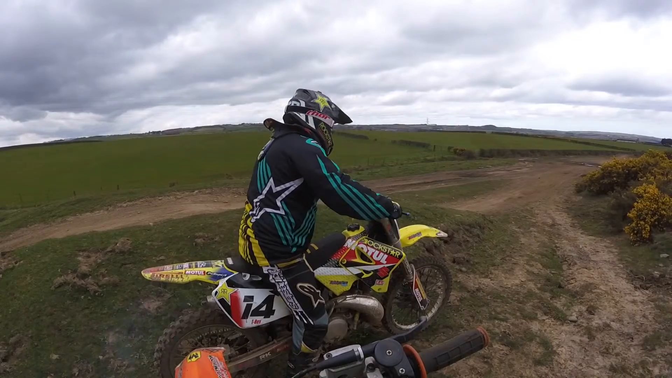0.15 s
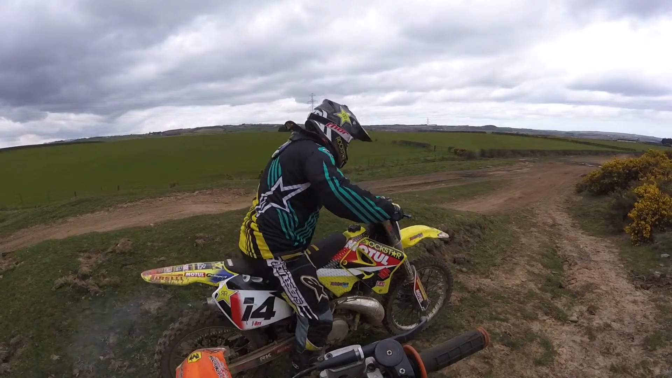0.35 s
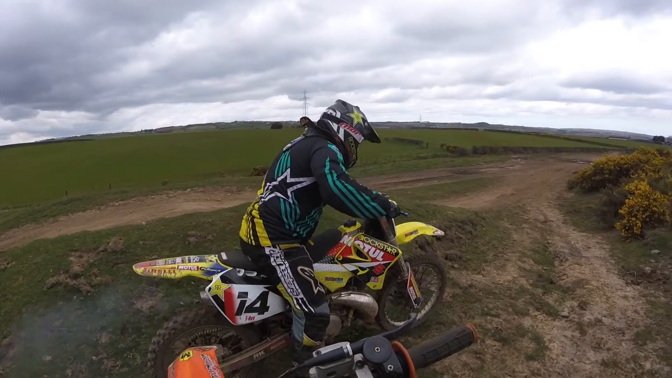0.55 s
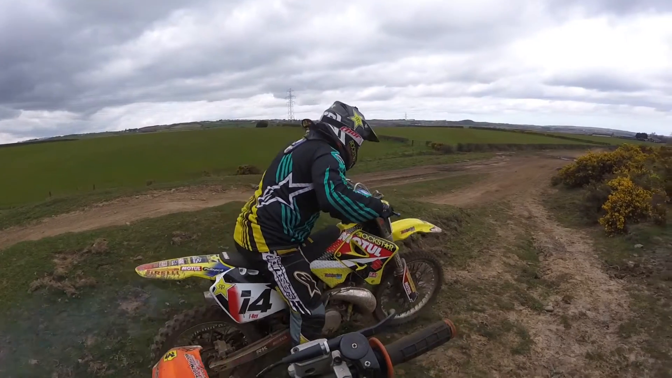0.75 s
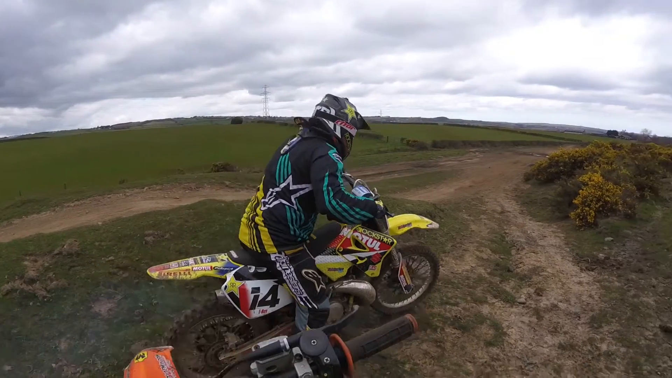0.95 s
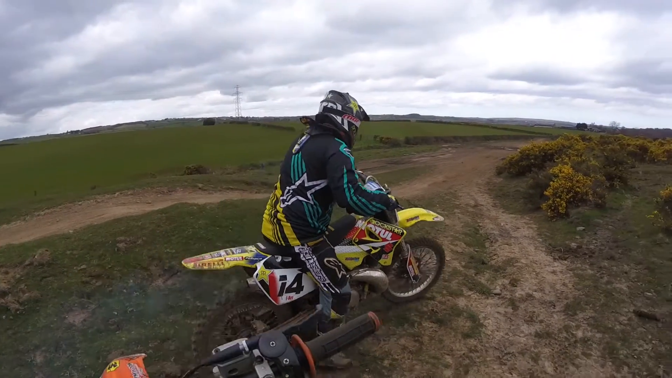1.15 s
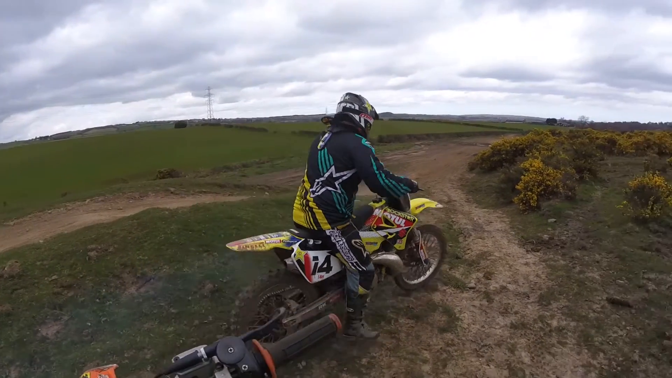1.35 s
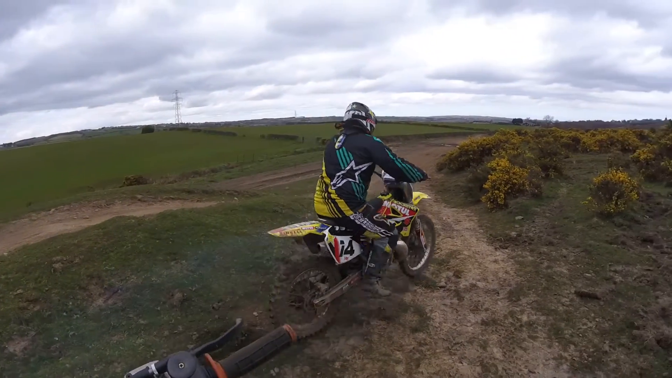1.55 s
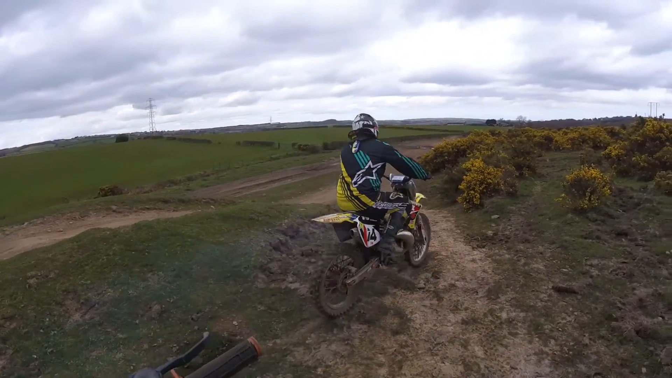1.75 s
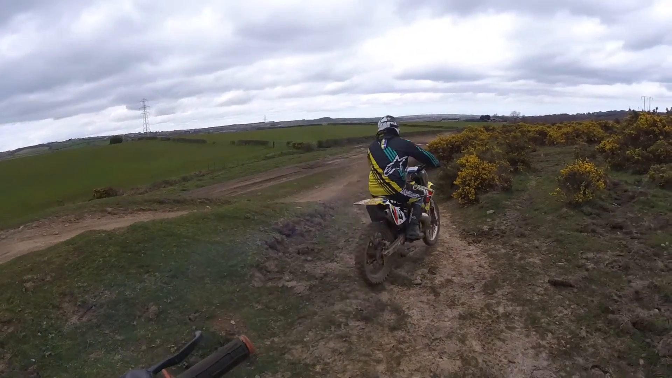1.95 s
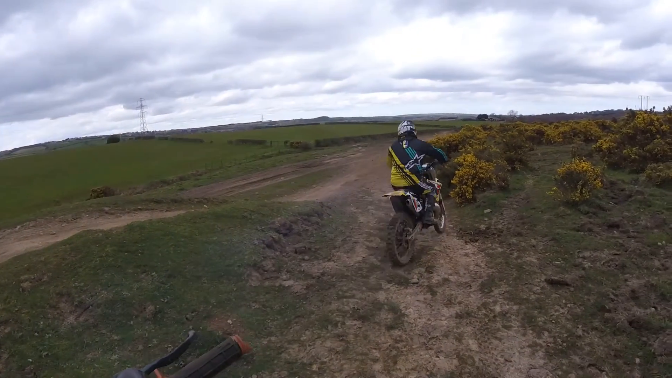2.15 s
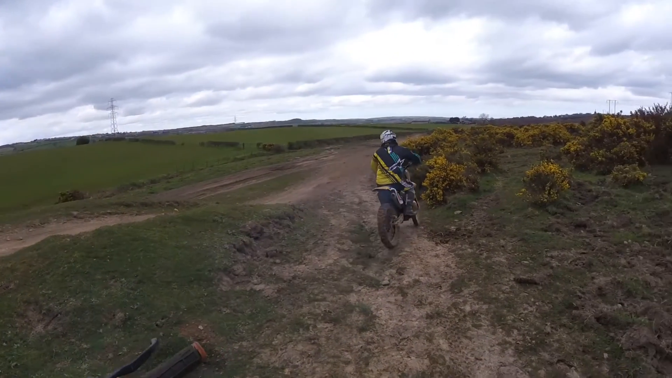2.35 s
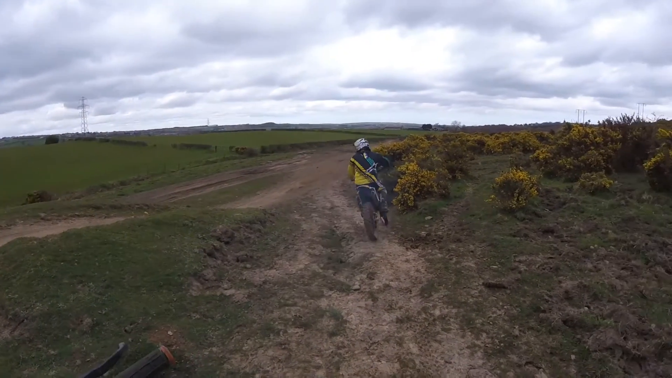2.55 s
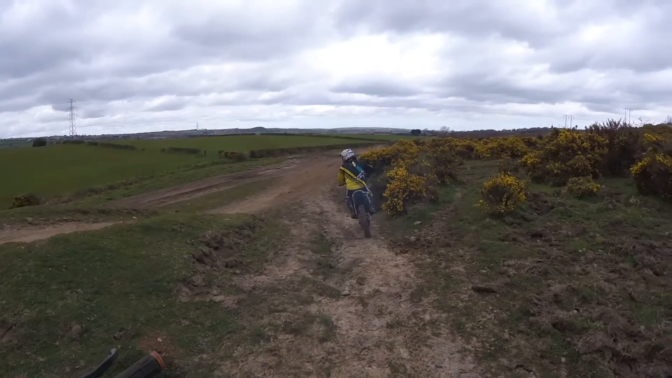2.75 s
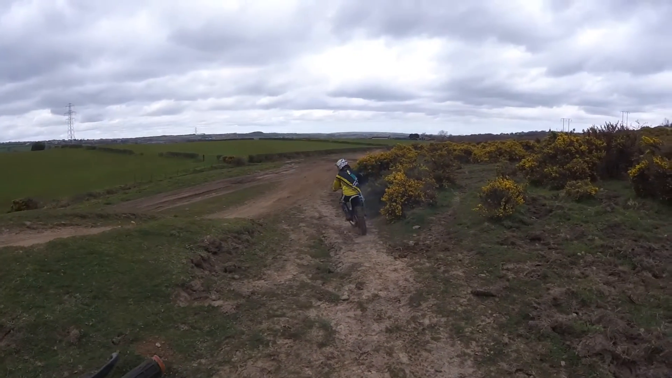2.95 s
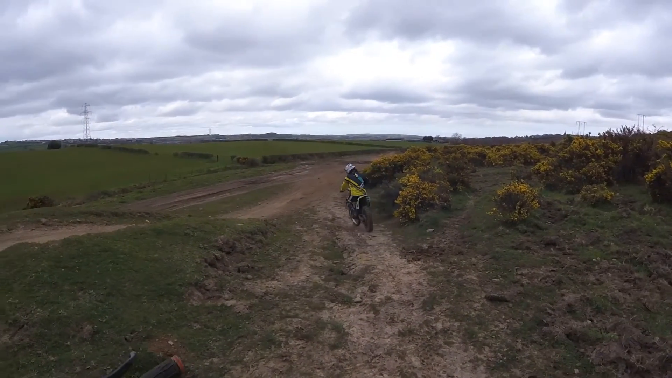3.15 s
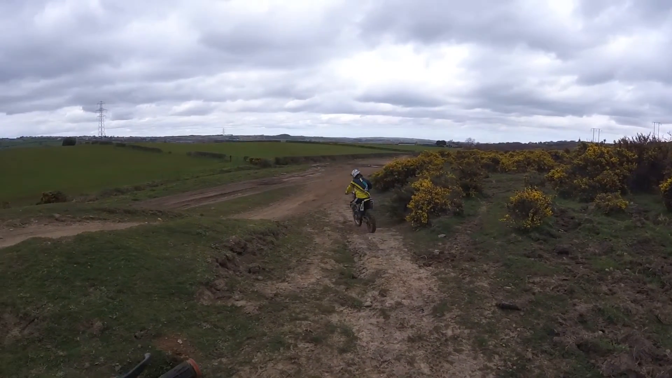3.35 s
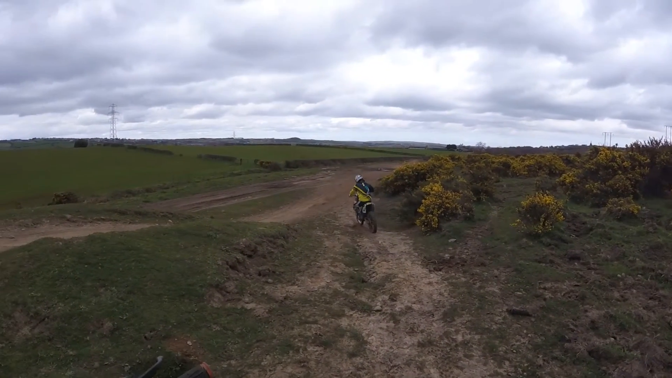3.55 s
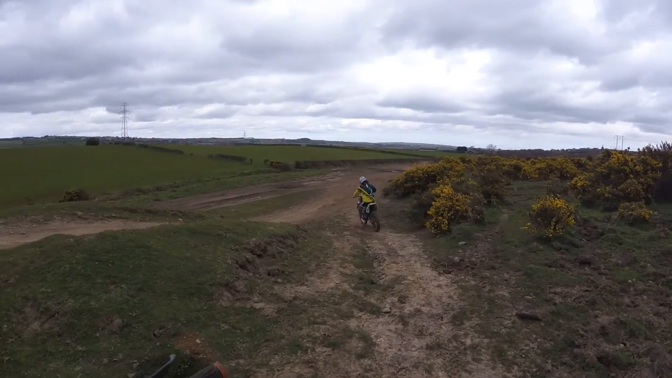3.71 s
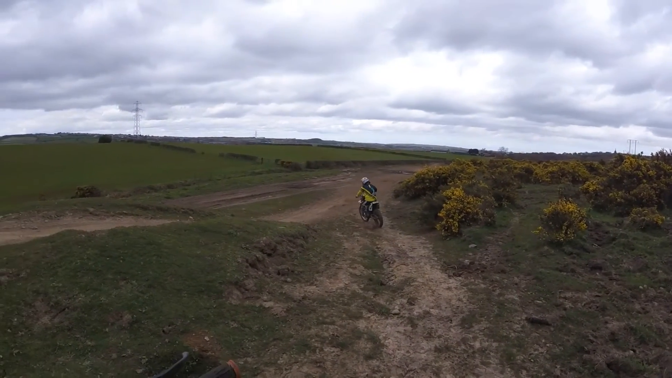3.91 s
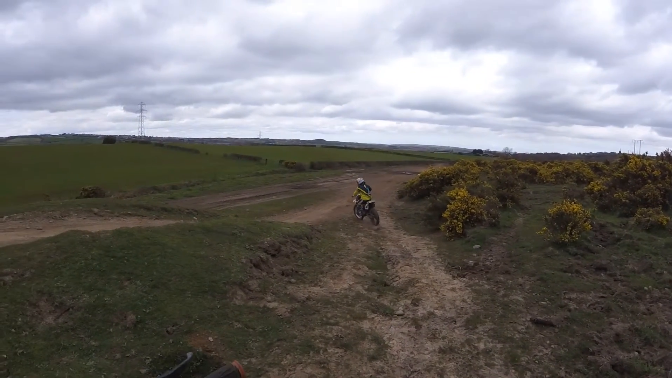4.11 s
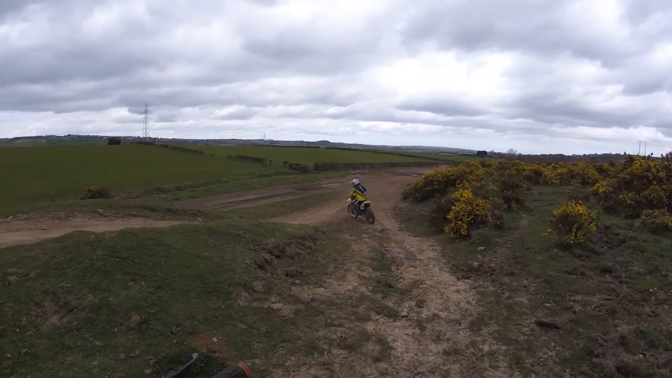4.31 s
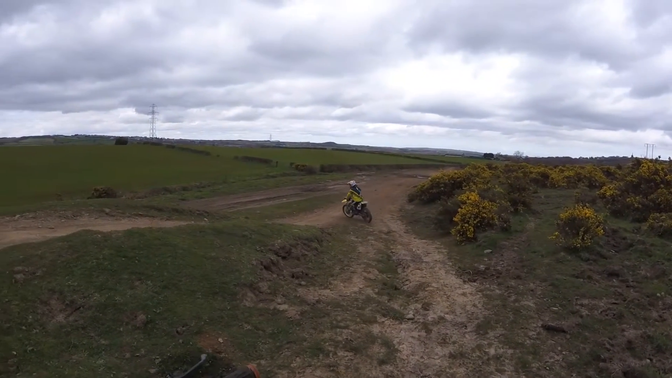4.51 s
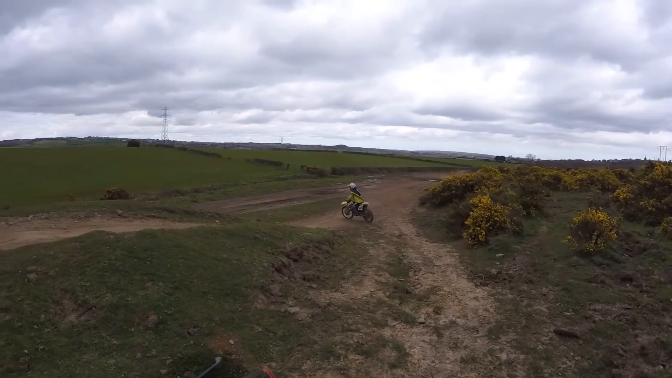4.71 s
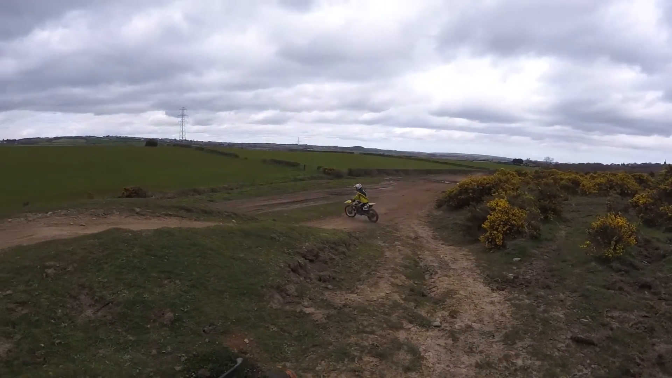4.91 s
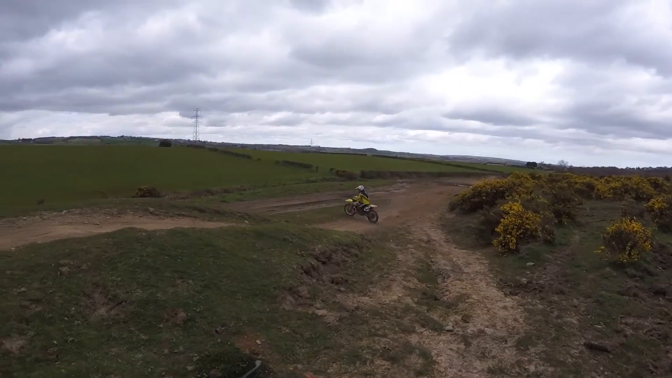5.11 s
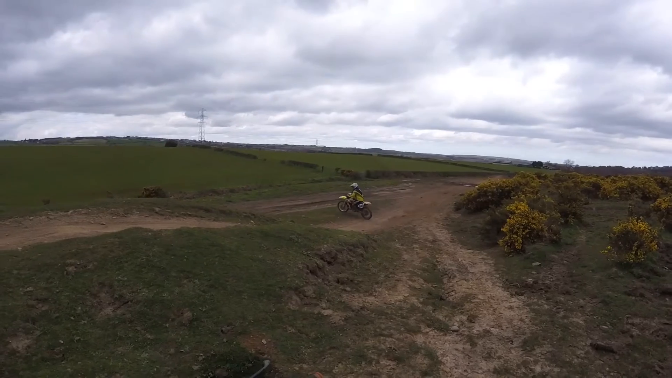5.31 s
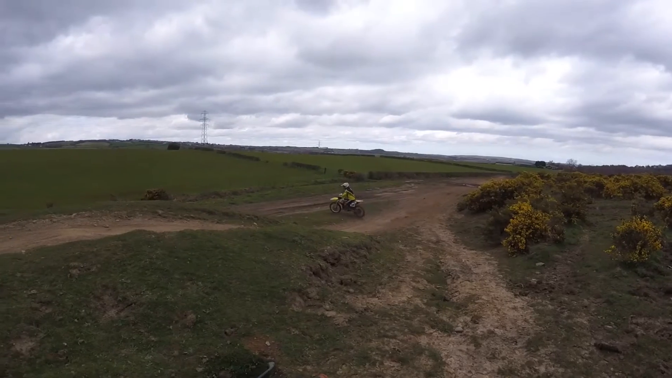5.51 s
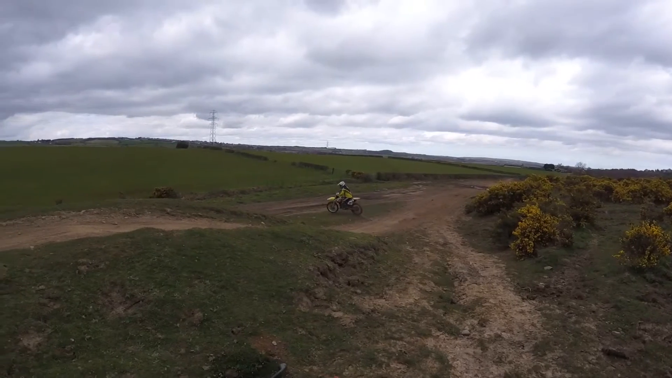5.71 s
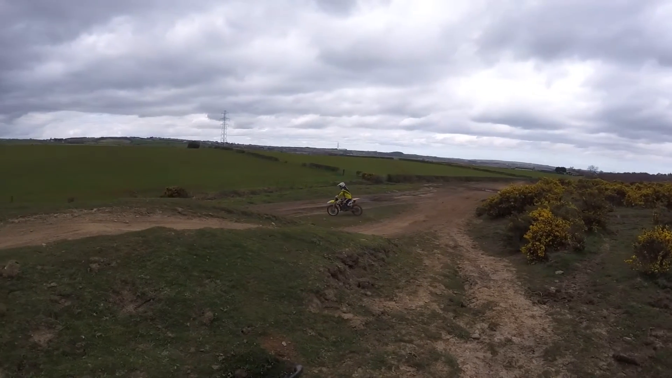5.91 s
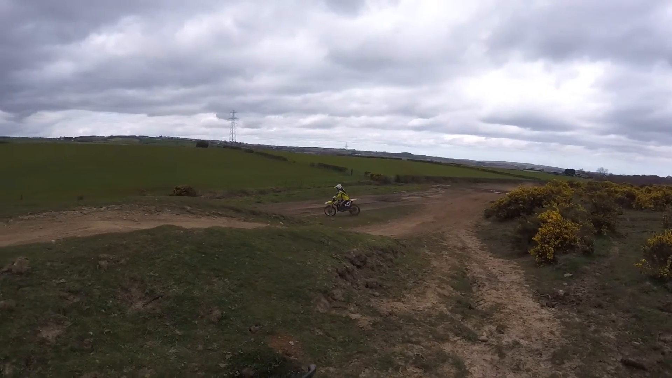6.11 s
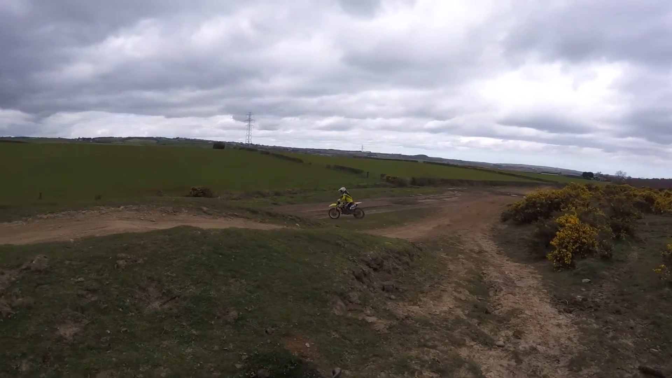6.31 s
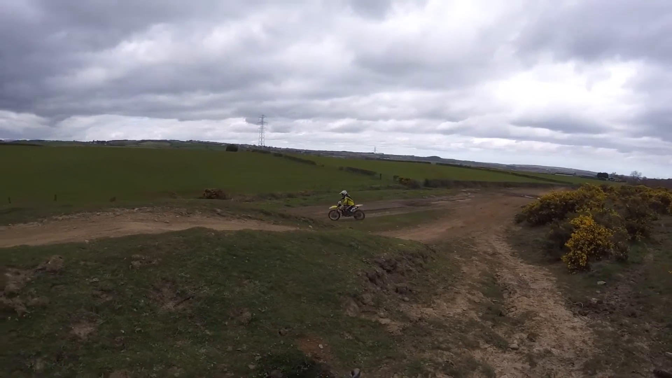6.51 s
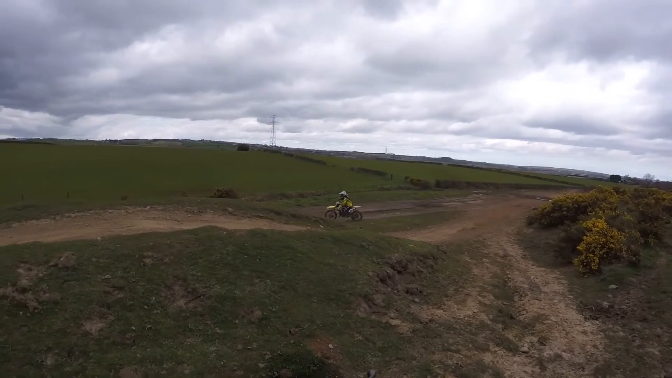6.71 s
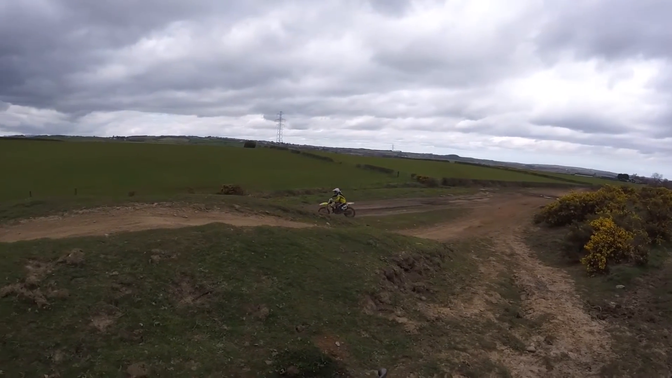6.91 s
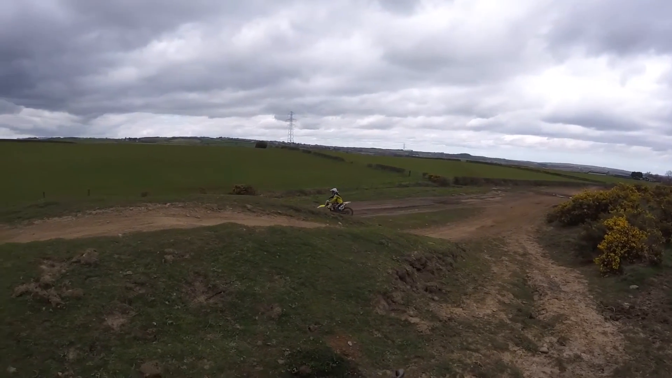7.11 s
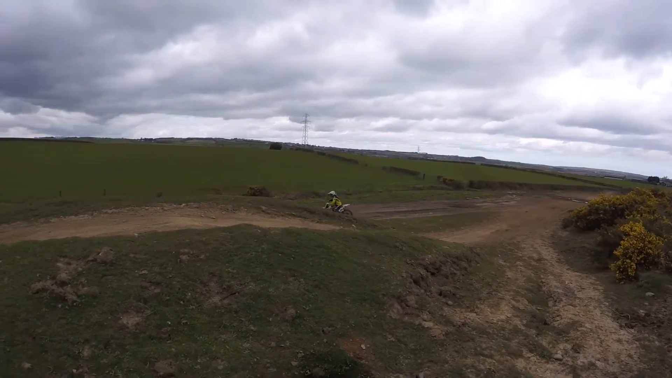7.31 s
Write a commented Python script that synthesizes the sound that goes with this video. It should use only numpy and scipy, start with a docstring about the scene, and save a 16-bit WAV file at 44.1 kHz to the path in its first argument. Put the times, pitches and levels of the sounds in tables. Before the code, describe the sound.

A two-stroke dirt bike idles raggedly up close, blips its throttle with sharp cracks, then rides off along a dirt track, popping fainter into wind.

```python
"""A two-stroke motocross bike blips its throttle beside the microphone, then rides away along a dirt track.
It fires on only some crank turns: each firing cracks, booms as pipe resonances and rings the steel shell and silencer.
Unfired turns slow between firings, with puffs and piston slaps; noise pulses rasp in the intake as air gulps.
Click trains make the chain, unsteady tones the brake drags and a late faint whine, metal modes the tings.
Slow noise makes wind over an open-field hush, and damped tones knock the mount."""
import sys
import numpy as np
from scipy import signal
from scipy.fft import rfft, irfft, next_fast_len
from scipy.io import wavfile
from scipy.ndimage import uniform_filter1d, map_coordinates

SR = 44100
rng = np.random.default_rng(int(sys.argv[2]) if len(sys.argv) > 2 else 0)


def file_out(sig):
    """Save sig as 16-bit WAV at sys.argv[1]."""
    # one column per channel
    cols = np.atleast_2d(sig).T
    # limit, then scale
    lim = np.clip(cols, -1, 1)
    pcm = np.round(lim * 32767).astype(np.int16)
    wavfile.write(sys.argv[1], SR, pcm)


N = 328974

# Spectra give relative density_db; body() sets their overall energy.
# nominal crank speed and pipe pitch: start_s, crank_turns_per_s, hot_gas_pitch_hz, unburnt_gas_pitch_hz
ENGINE = [(0, 42, 333, 292), (.3, 39.5, 324, 266), (.45, 45, 313.4, 275), (0.649, 62, 326.4, 222),
          (.9, 52, 326.3, 227), (1.221, 59, 350.3, 272), (1.58, 48, 349.3, 282), (1.9, 44, 384.5, 342),
          (2.25, 32, 375, 306), (2.55, 48, 270, 245), (3, 46, 315.5, 252), (3.998, 41, 346, 251),
          (4.998, 55, 301, 201), (6, 43, 312, 200), (7.46, 39, 331, 193)]
# exhaust pipe modes: multiple_of_pipe_pitch, relative_level_db, time_to_peak_s
PIPE_MODES = [(1, 10, 0.0044), (.3, -14, 0.0089), (0.72, -29, 0.0033), (1.138, -11, 0.025),
              (2.67, -16, 0.0061), (3.82, -17.5, 0.0096)]
# fixed tone colour of the bike, peaks and dips: center_hz, width_hz, lift_db (negative cuts)
BIKE_COLOUR = [(826, 60, 7), (1257, 100, 5), (1800, 160, 4), (2340, 150, 3), (2720, 260, -4),
               (3200, 450, 5), (3720, 170, -8), (3990, 180, 5), (4391, 90, 7), (4634, 70, 4),
               (5020, 200, -7), (5410, 220, 5), (5800, 200, -3), (6200, 250, 6), (7150, 150, -3),
               (7630, 350, 7), (8300, 350, -8), (8868, 300, 6), (9450, 250, -6), (10730, 300, -7)]
# high steel modes of the expansion chamber: pitch_hz, relative_level_db, t60_s
STEEL_MODES = [(2960, -12, 0.22), (3080, -5.5, 0.13), (3180, -5.5, 0.31), (3290, -0.5, 0.1),
               (3470, 1, 0.054), (3530, -2.5, 0.21), (4120, -4, 0.089), (4430, -27, 0.15)]
# tone colour of the intake, peaks and dips: center_hz, width_hz, lift_db (negative cuts)
INTAKE_COLOUR = [(1036, 190, 8.5), (1341.5, 49, -4.5), (2210, 75, 14), (2420, 150, 11), (3300, 88, -8),
                 (4145, 140, 17)]
# spectrum of the exhaust pressure step: frequency_hz, density_db
CRACK_SPECTRUM = [(120, 19.5), (420, 17), (600, 6.5), (820, -14.5), (1080, -31), (1400, -11), (1750, 5.5),
                  (2100, -11), (2700, 10.5), (3450, 14.5), (4600, -11.5), (7500, -16), (10000, -31),
                  (14000, -50)]
# spectrum of the spit of gas: frequency_hz, density_db
SPIT_SPECTRUM = [(400, 6), (800, -26.5), (1400, 9.5), (2000, 8.5), (2700, -0.5), (3450, -2), (4600, -35),
                 (7500, -19), (12000, -24), (14500, -52)]
# spectrum of the longer gas rush: frequency_hz, density_db
GAS_SPECTRUM = [(250, 5), (620, -8), (1000, -6), (2000, 1.5), (2700, -0.5), (3500, -2), (5000, -9),
                (7500, -12), (9500, -22), (12000, -22.5), (14500, -42)]
# spectrum of gears and piston slap: frequency_hz, density_db
CLATTER_SPECTRUM = [(300, 4.5), (620, -3), (1000, 1), (2200, -1), (2750, -3.5), (3500, 1), (5000, -16),
                    (7500, -16.5), (10000, -69), (14500, -44)]
# spectrum of the thud behind the tailpipe: frequency_hz, density_db
THUD_SPECTRUM = [(80, -6.5), (200, 4.5), (330, -7.5), (430, 2.5), (520, -22.5), (640, -11.5), (800, -19),
                 (1200, -54)]
# spectrum straight down the tailpipe: frequency_hz, density_db
BLAST_SPECTRUM = [(120, -8), (240, 11), (400, -12), (500, -8), (640, 13), (800, -23), (1500, -19),
                  (2400, 8), (3000, 3), (4500, -6), (9000, -26), (14000, -49)]
# spectrum of the thin chamber wall: frequency_hz, density_db
WALL_SPECTRUM = [(900, -26), (1700, -12), (2300, -4.5), (2750, -1), (3100, 0), (3450, 5.5), (3800, -9),
                 (5000, -26), (12000, -45)]
# spectrum of the airbox: frequency_hz, density_db
AIRBOX_SPECTRUM = [(150, -14.5), (450, 9), (630, -15), (900, -8.5), (1300, 4.5), (1700, -8), (2400, -3),
                   (3000, -3), (3500, -5), (4300, -16.5), (5300, -32), (8000, -32), (12000, -56)]
# spectrum of chain links on the sprocket: frequency_hz, density_db
LINK_SPECTRUM = [(600, -7.5), (1100, -13.5), (1480, 9), (1700, 7), (2050, 7), (2260, -10), (2850, -3),
                 (4200, -19), (6000, -20), (12000, -58)]
# spectrum of chain links on the guide: frequency_hz, density_db
GUIDE_SPECTRUM = [(900, -30), (1700, 4), (2300, -4), (2800, -2), (3400, -14), (4200, -4), (5000, -31),
                  (12000, -40)]
# spectrum of slow wind pressure: frequency_hz, density_db
SWAY_SPECTRUM = [(4, 0), (10, 5.5), (18, 2.5), (28, -12.5), (45, -14.5), (100, -75.5)]
# spectrum of wind buffets: frequency_hz, density_db
BUFFET_SPECTRUM = [(10, 2.5), (25, -9.5), (45, -7), (100, -11.5), (200, -19), (400, -27), (1000, -64.5)]
# spectrum of the open-field hush: frequency_hz, density_db
AIR_SPECTRUM = [(59, -31), (100, -0.5), (342, -7), (448, -13), (786, -17), (1700, -17.5), (2680, -23.5),
                (3310, -22), (9170, -34.5), (12800, -45.5), (14500, -72)]
# individual firings: start_s, strength_db
POPS = [(0.0028, -10.5), (0.171, -3), (0.3443, 0.5), (0.4377, 1.5), (0.5169, 5), (0.5717, 4), (0.6409, 5.5),
        (0.832, 2), (0.866, -4.5), (0.882, -4), (0.9164, 0), (0.9897, -0.5), (1.0426, -8), (1.2006, -3.5),
        (1.237, 0), (1.255, -7), (1.288, -2.5), (1.3469, 3), (1.3641, -10), (1.923, -14), (1.9383, -8.5),
        (1.9783, -7), (2.0946, 0), (2.243, -3.5), (2.3731, -5), (2.4823, -2), (2.5747, -1.5),
        (2.6865, -1.5), (2.7701, -2), (3.029, -8), (3.1547, -11.5), (3.2684, -7.5), (3.454, -2),
        (3.6968, -2), (3.9165, -8.5), (4.0733, -8), (4.286, -4), (4.524, -10.5), (4.597, -3.5), (4.688, -1),
        (4.7934, -2), (5.3007, -4), (5.437, -3.5), (5.63, -1.5), (5.68, -14), (5.8419, -9.5), (5.965, -4),
        (6.007, -1.5), (6.0649, -1.5), (6.135, 0.5), (6.224, -13), (6.311, 0), (6.4002, 2.5), (6.522, -5),
        (7.3742, 6), (7.4335, 9)]
# stretches of evenly spaced firings: first_s, last_s, nominal_firings_per_s, strength_db
RUNS = [(0.688, 0.781, 21, 2.5), (0.9725, 1.077, 19, 0.5), (1.113, 1.185, 28, -2), (1.427, 1.6384, 24, -1),
        (1.68, 1.887, 24, -0.5), (4.8959, 5.181, 10.6, 0.5), (6.652, 6.894, 12.4, 2),
        (6.983, 7.282, 10, 5.5)]
# path of the ride: time_s, distance_m
DISTANCE = [(0, 1.08), (1.3, 2.05), (1.9, 2.57), (2.3, 4.65), (3.2, 5.8), (4.3, 9.7), (5.5, 16.5),
            (7.46, 35)]
# effect of heading: time_s, boom_db, crack_db, engine_side_db, relative_thud_db
FACING = [(0, -1.5, 8, 1, 8), (.7, 1, -3, 0, 2.5), (1.25, 3.5, 5, 1.5, -1), (1.501, 1, 8, -0.5, 5.5),
          (1.89, 3.5, 6.5, 1, -19), (2.2, -3.5, 9.5, 0.5, 8), (2.45, -16, 15, 2.5, -1.5),
          (3.2, -0.5, 10.5, -1, 2), (3.7, -7, 8.5, -1.5, 8), (4.1, -7.5, 10, -2, 4),
          (4.799, 1.5, 4.5, 1.5, 9), (5.45, -7.5, 3.5, -1, 9), (6.102, -0.5, 4, 4.5, -5),
          (6.6, -6, -4, 1.5, 1), (7, -4.5, -23, -4, 0), (7.46, -19, -18, -11, -6)]
# silencer honk by heading: time_s, nominal_pitch_hz, level_relative_to_crack_db
HONK = [(.6, 1100, -10), (1.1, 1140, 1), (1.5, 1456, 1), (2.1, 1500, 6), (2.243, 1524, 9), (2.4, 1710, -7),
        (3.45, 1610, 1), (3.697, 1710, 7.5), (4.3, 1590, 7), (4.9, 1275, 3.5), (5.5, 1270, 10.5),
        (6.2, 1230, 7.5), (6.6, 1260, 4)]
# unburnt gas pushed out on idle turns: time_s, relative_level_db
UNBURNT = [(0, -0.5), (.7, 3), (1.3, -1.5), (2.3, -4.5), (2.9, 8), (3.3, -4), (4.4, 2), (5.1, 1.5),
           (6.2, 5), (6.7, -9), (7.46, 0)]
# thin-wall tinkle: time_s, level_db
TINKLE = [(0.05, -60), (.45, -72), (1.3, -62), (2.1, -61), (2.8, -61.5), (4.2, -75), (4.7, -66),
          (5.2, -66.5), (5.6, -73.5), (6.15, -62), (6.45, -66), (6.7, -70), (7.1, -69), (7.46, -77)]
# throttle opening as heard at the intake: time_s, relative_level_db
THROTTLE = [(0.399, -50), (.62, -42.5), (.8, -39), (0.999, -37), (1.3, -40), (1.442, -47), (1.8, -48),
            (1.93, -43), (2.05, -61)]
# slack chain on the sprocket: middle_s, length_s, level_db
CHAIN_RATTLES = [(1.886, 0.28, -54), (2.203, 1, -58.5), (3.289, 0.046, -56), (3.352, 0.64, -55.5),
                 (3.592, .12, -56), (3.874, 0.4, -63.5)]
# chain along its guide: middle_s, length_s, level_db
GUIDE_RASPS = [(2.906, 0.29, -61), (3.341, 0.24, -58), (3.869, 0.28, -63.5), (4.465, 0.11, -64.5)]
# chain pace before wander: time_s, links_per_s
LINK_RATE = [(2.0, 112), (3.22, 118), (3.38, 126), (3.62, 134), (3.72, 120), (3.92, 140)]
# brake drags, and a late faint steady whine:
# middle_s, length_s, pitch_hz, relative_level_db, crank_pulse_share, note_steadiness
DRAGS_AND_WHINE = [(2.073, 0.2, 1658, -54, 1, 0.26), (2.264, 0.17, 1540, -53, 1, .1),
                   (3.872, 0.15, 1640, -63, 0.1, 1.2), (4.13, 0.4, 1644, -62, 0.4, 0.92),
                   (7.036, 0.36, 3130, -67.5, 0.3, 2)]
# stretches in which firings excite a loose part: from_s, to_s, relative_level_db
LOOSE_RINGS = [(3.2, 3.5, -52), (4.25, 4.3, -64), (4.75, 5.05, -55), (5.05, 5.2, -52), (5.6, 5.7, -60.5),
               (6.95, 7.1, -58.5)]
# gusts above the calm breeze: middle_s, length_s, sway_level_db, buffet_level_db
GUSTS = [(0.553, 0.1, -37, -61), (0.82, 1.1, -46, -55), (1.377, 2.6, -48.5, -48.5),
         (2.617, 0.4, -29.5, -50), (3.89, 1.8, -39.5, -76), (4.33, 0.098, -58, -57), (5.105, 0.2, -42, -72),
         (5.492, 0.11, -37, -78), (6.033, 0.046, -33, -49), (6.886, 0.065, -41, -45.5),
         (7.042, 1.12, -42, -53)]
# soft knocks on the microphone mount: start_s, relative_level_db
KNOCKS = [(4.33, -29.5), (6.853, -31), (6.887, -44), (7.257, -42)]

# firing levels before distance, heading, strength and each source's own gain
BOOM_DB, CRACK_DB, SHELL_DB = -19.5, -33.5, -37.5
BOOM_SHARE = 0.45  # fraction of strength in dB reaching the boom; crack and shell take it all
FADE_DB_PER_DOUBLING = 4.5
BUSY_S, CRUISE_PER_S = 0.21, 11.2  # averaging time; reference firing rate
PUFF_GROWS_DB, CLATTER_GROWS_DB = 4, 2  # per doubling of firing rate
COLD_START, WARM_S = .16, 0.0035  # fraction flat at onset; time constant of the rise
COOL_S = .028  # time constant of the pipe's return towards unburnt-gas pitch
GROUND_S, GROUND_DB = 0.00155, -13.5  # bounce delay before scatter; level relative to the crack
TOP_HZ = 14500


def amp(db):
    """Decibel law: 20 dB is a factor of ten in amplitude."""
    return 10 ** (np.asarray(db) / 20)


def unit(x):
    """Normalisation to an rms amplitude of 1."""
    return x / np.sqrt(np.mean(x ** 2) + 1e-20)


def curves(rows):
    """Linear interpolation: one value per sample for each column after time."""
    time_s, *columns = np.transpose(rows)
    return [np.interp(np.arange(N) / SR, time_s, column) for column in columns]


def wobble(rate_hz):
    """Random modulation: a smooth spline through rate_hz random knots a second."""
    knots = rng.standard_normal(int(N * rate_hz / SR) + 4)
    return map_coordinates(knots, [np.arange(N) * rate_hz / SR])


def swell(middle_s, length_s, flat=2):
    """Smooth rise and fall; a higher flat holds the top longer."""
    return np.exp(-np.abs(2 * (np.arange(N) / SR - middle_s) / length_s) ** flat)


def add(track, start_s, sound):
    """Superposition: sum a sound into a track from start_s on."""
    start = min(max(round(start_s * SR), 0), N)
    track[start:start + len(sound)] += sound[:N - start]


def body(spectrum, colour=(), size=8192):
    """Minimum-phase response: a causal, unit-energy filter with a given spectrum, peaks and dips."""
    hz = np.fft.rfftfreq(size, 1 / SR)
    knots_hz, density_db = np.transpose(spectrum)
    db = np.interp(np.log(hz + 1), np.log(knots_hz), density_db)
    for center_hz, width_hz, lift_db in colour:
        db = db + lift_db / (1 + (2 * (hz - center_hz) / width_hz) ** 2)
    # folding the cepstrum onto positive time makes the response causal
    cepstrum = irfft(np.log(amp(db)))
    cepstrum[1:size // 2] *= 2
    cepstrum[size // 2 + 1:] = 0
    response = irfft(np.exp(rfft(cepstrum)))
    return response / np.linalg.norm(response)


def through(x, response):
    """Linear filtering: convolve a source with an impulse response."""
    return signal.fftconvolve(x, response)[:N]


def noise(spectrum, colour=()):
    """Coloured noise of rms 1: white noise through a body."""
    return unit(through(rng.standard_normal(N), body(spectrum, colour)))


def bursts(times, sizes, t60):
    """Exponential decay: an envelope that jumps at each time and falls 60 dB in t60 seconds."""
    samples = np.clip(np.round(np.asarray(times) * SR).astype(int), 0, N)
    kicks = np.bincount(samples, sizes, N + 1)
    return through(kicks, amp(-60 * np.arange(SR // 4) / SR / t60))


def impulses(times, sizes):
    """Impulsive excitation: one sample per event, weighted by its size."""
    return np.bincount(np.round(np.abs(times) * SR).astype(int), sizes, N)


def distance_db():
    """Spreading loss: level falls by a fixed amount per doubling of distance."""
    metres, = curves(DISTANCE)
    return -FADE_DB_PER_DOUBLING * np.log2(np.maximum(metres, .5) / DISTANCE[0][1])


def firings():
    """Source, path and directivity levels add: ordered rows of start_s, boom_db, crack_db, shell_db."""
    events = [tuple(pop) for pop in POPS]
    for first, last, rate, db in RUNS:
        count = round((last - first) * rate) + 1
        events += [(s, db) for s in np.linspace(first, last, count)]
    times, strength = np.transpose(sorted(events))
    when, *aims = np.transpose(FACING)
    boom, crack, side, _ = [np.interp(times, when, aim) for aim in aims]
    far = np.interp(times * SR, np.arange(N), distance_db())
    boom_db = BOOM_DB + far + boom + BOOM_SHARE * strength
    crack_db = CRACK_DB + far + crack + strength
    shell_db = SHELL_DB + far + side + strength
    return np.transpose([times, boom_db, crack_db, shell_db])


def idle_strokes(sag=0.0936):
    """Crank deceleration: whole unfired turns fit between firings, each slower than the last."""
    when, speed, *_ = np.transpose(ENGINE)
    fired = np.append(firings()[:, 0], N / SR)
    times = []
    for a, b in zip(fired[:-1], fired[1:]):
        turns = max(round((b - a) * np.interp(a, when, speed)), 1)
        u = np.arange(1, turns) / turns
        times.extend(a + (b - a) * (u - sag * u * (1 - u)))
    return np.array(times)


def crank_turns():
    """The engine cycle: times of all turns, unfired ones followed by fired ones."""
    return np.concatenate([idle_strokes(), firings()[:, 0]])


def effort():
    """Local event rate: smoothed firing density in doublings of the reference rate, per sample."""
    grid = np.arange(0, N / SR, .01)
    offsets = (grid[:, None] - firings()[:, 0]) / BUSY_S
    rate = np.exp(-np.pi * offsets ** 2).sum(axis=1) / BUSY_S
    return np.interp(np.arange(N) / SR, grid, np.log2((rate + 1) / CRUISE_PER_S))


def pipe(start_s, heat=1, scatter=.012):
    """Pipe resonance: modes swell and decay, bending up at onset; hot gas changes the ringing pitch."""
    when, _, hot_hz, cold_hz = np.transpose(ENGINE)
    hz = np.interp(start_s, when, cold_hz + heat * (hot_hz - cold_hz))
    hz *= 1 + scatter * rng.standard_normal()
    t = np.arange(SR // 8) / SR
    cycles = hz * (t - COLD_START * WARM_S * (1 - np.exp(-t / WARM_S)))
    ring = np.zeros(len(t))
    for ratio, db, peak_s in PIPE_MODES:
        bloom = (t / peak_s * np.exp(1 - t / peak_s)) ** 2
        ring -= amp(db) * bloom * np.sin(2 * np.pi * ratio * cycles)
    return ring / np.abs(ring).max()


def steel(detune=0.0042, scatter_db=3):
    """Modal vibration: damped chamber-wall modes, with new strengths, pitches and phases at each strike."""
    hz, db, t60 = np.transpose(STEEL_MODES)[..., None]
    pitch, size, phase = rng.standard_normal((3, len(STEEL_MODES), 1))
    t = np.arange(SR // 3) / SR
    decay = amp(db + scatter_db * size - 60 * t / t60)
    modes = decay * np.sin(2 * np.pi * (hz * (1 + detune * pitch) * t + phase))
    return modes.sum(axis=0)


def wind(air_db=-58, restless_db=2):
    """Turbulent pressure: slow swings and buffets on the microphone, over the hush of open fields."""
    breeze_db = restless_db * wobble(3.5)
    sway = amp(-45.5 + breeze_db)
    buffet = amp(-51.5 + breeze_db)
    for middle, length, sway_db, buffet_db in GUSTS:
        gust = swell(middle, length)
        sway += amp(sway_db) * gust
        buffet += amp(buffet_db) * gust
    hush = amp(air_db + wobble(1.94)) * noise(AIR_SPECTRUM)
    return sway * noise(SWAY_SPECTRUM) + buffet * noise(BUFFET_SPECTRUM) + hush


def crank(puff_db=-37, clatter_db=-50, slap_db=10, slap_t60=.022, slap_lead_s=.008):
    """Mechanical impact and gas pulsation: unfired turns slap and puff over the steady whirr of gears."""
    busy, far_db, side_db = effort(), distance_db(), curves(FACING)[2]
    puffs_db = puff_db + far_db + PUFF_GROWS_DB * busy + side_db + curves(UNBURNT)[0]
    running_db = clatter_db + far_db + CLATTER_GROWS_DB * busy + side_db
    idle, fired = idle_strokes(), firings()[:, 0]
    whirr = noise(CLATTER_SPECTRUM, BIKE_COLOUR)
    knock = bursts(idle - slap_lead_s, amp(rng.standard_normal(len(idle))), slap_t60)
    slaps = amp(slap_db) * knock * noise(CLATTER_SPECTRUM, [(2100, 550, 16)])
    since_firing_s = idle - fired[np.searchsorted(fired, idle) - 1]
    puffs = np.zeros(N)
    for s, heat in zip(idle, np.exp(-since_firing_s / COOL_S)):
        add(puffs, s, amp(rng.normal(0, 2.2)) * pipe(s, heat, scatter=.04))
    return amp(puffs_db) * puffs + amp(running_db) * (whirr + slaps)


def tinkle(t60=0.075, lead_s=.003, scatter_db=2.0):
    """Wall excitation: the pressure wave of every turn, fired or not, taps the thin chamber wall."""
    turns = crank_turns()
    taps = bursts(turns - lead_s, amp(scatter_db * rng.standard_normal(len(turns))), t60)
    ring = through(taps * rng.standard_normal(N), body(WALL_SPECTRUM))
    return amp(curves(TINKLE)[0]) * unit(ring)


def exhaust(crack_gain_db=14, spit_db=-16, ring_db=-4, gas_db=1, crack_lag_s=0.00038):
    """Blowdown: a pressure step and its ground bounce, spitting gas, pipe boom, shell ring and longer rush."""
    spit_t60, gas_t60, blowdown_s, ground_scatter = 0.036, 0.17, 0.016, .12
    rings, steps = np.zeros(N), np.zeros(N)
    for s, boom_db, crack_db, shell_db in firings():
        add(rings, s, amp(boom_db) * pipe(s))
        add(rings, s, amp(shell_db + ring_db) * steel())
        step_db = crack_db + crack_gain_db
        bounce_s = GROUND_S * np.exp(ground_scatter * rng.standard_normal())
        add(steps, s + crack_lag_s, -amp([step_db]))
        add(steps, s + crack_lag_s + bounce_s, -amp([step_db + GROUND_DB]))
    times, _, crack_db, shell_db = firings().T
    spit_envelope = bursts(times, amp(crack_db + crack_gain_db + spit_db), spit_t60)
    spit = spit_envelope * rng.standard_normal(N)
    flow = bursts(times, amp(shell_db + gas_db), gas_t60)
    opening_flow = uniform_filter1d(flow, int(blowdown_s * SR))  # the port takes a moment to open
    rush = opening_flow * rng.standard_normal(N)
    crack = through(steps, body(CRACK_SPECTRUM))
    spit = through(spit, body(SPIT_SPECTRUM, BIKE_COLOUR))
    rush = through(rush, body(GAS_SPECTRUM, BIKE_COLOUR))
    return rings + crack + spit + rush


def thuds(thud_db=12):
    """Directivity: each pressure step also arrives as a short, broad thud whose level follows the heading."""
    times, _, crack_db, _ = firings().T
    when, *_, behind_db = np.transpose(FACING)
    sizes = amp(crack_db + thud_db + np.interp(times, when, behind_db))
    return through(impulses(times, -sizes), body(THUD_SPECTRUM))


def honks(t60=0.023, detune=.025):
    """Silencer resonance: each firing excites a brief, damped tone."""
    track, t = np.zeros(N), np.arange(SR // 12) / SR
    when, pitch, level = np.transpose(HONK)
    for s, _, crack_db, _ in firings():
        hz = np.interp(s, when, pitch) * (1 + detune * rng.standard_normal())
        db = crack_db + np.interp(s, when, level)
        onset = 1 - np.exp(-t * hz)
        add(track, s, -amp(db - 60 * t / t60) * np.cos(2 * np.pi * hz * t) * onset)
    return track


def intake(lead_s=0.006, rise_s=0.0027, gulp_t60=.06, intake_db=1):
    """Flow noise through a cavity: each turn gulps air and claps the reed in a slightly altered airbox."""
    reed_s, reed_snap, detune, lift_scatter_db = .006, 5, .01, 1.5
    when, db = np.transpose(THROTTLE)
    turns = crank_turns()
    track, t = np.zeros(N), np.arange(SR // 12) / SR
    snap = reed_snap * (np.arange(len(t)) == round(reed_s * SR))
    gulp = (1 - np.exp(-t / rise_s)) * amp(-60 * t / gulp_t60)
    for s in np.sort(turns[(turns > when[0]) & (turns < when[-1])]):
        colour = []
        for hz, width, lift in INTAKE_COLOUR:
            a, b = rng.standard_normal(2)
            colour.append((hz * (1 + detune * a), width, lift + lift_scatter_db * b))
        airbox = body(AIRBOX_SPECTRUM, [*BIKE_COLOUR, *colour], size=4096)
        air = signal.fftconvolve(gulp * rng.standard_normal(len(t)) + snap, airbox)
        add(track, s - lead_s, 2 * amp(np.interp(s, when, db) + intake_db) * air)
    return track


def chain(second_db=-5, wander=.014):
    """Repeated impact: links click on sprocket and guide, more weakly as they leave, with a little grit."""
    jitter_s, tick_t60, scatter_db, grit = .000055, .012, 2, .09
    speed = curves(LINK_RATE)[0] * (1 + wander * wobble(11))
    slack = sum(amp(db) * swell(s, length) for s, length, db in CHAIN_RATTLES)
    drag = sum(amp(db) * swell(s, length) for s, length, db in GUIDE_RASPS)
    half_links = np.floor(2 * np.cumsum(speed) / SR)  # arrival and departure of each link
    times = np.flatnonzero(np.diff(half_links)) / SR
    chance = rng.standard_normal((len(times), 2))
    sizes = amp(scatter_db * chance[:, 0] + second_db * (np.arange(len(times)) % 2))
    envelope = bursts(times + jitter_s * chance[:, 1], sizes, tick_t60)
    ticks = np.diff(envelope, prepend=0) + grit * envelope * rng.standard_normal(N)
    sprocket = slack * unit(through(ticks, body(LINK_SPECTRUM)))
    return sprocket + drag * unit(through(ticks, body(GUIDE_SPECTRUM)))


def brake_and_whine(flutter_hz=130, crank_jerk=3, jerk_t60=.03, chatter_db=1.2):
    """Modulated tones: brake drags sound unsteady disc modes pulsing with the crank; a faint whine is steadier."""
    t, turns = np.arange(N) / SR, crank_turns()
    jerks = unit(1 + crank_jerk * bursts(turns, np.ones(len(turns)), jerk_t60))
    unsteadiness = wobble(flutter_hz) + 1j * wobble(flutter_hz)
    tones = np.zeros(N)
    for s, length, hz, db, share, steady in DRAGS_AND_WHINE:
        note = unit(((steady + unsteadiness) * np.exp(2j * np.pi * hz * t)).real)
        pulse = 1 + np.clip(share, 0, 1) * (jerks - 1)
        tones += amp(db) * swell(s, length, flat=12.0) * pulse * note
    return unit(amp(chatter_db * wobble(60))) * tones


def blasts(blast_db=12):
    """Directivity: the tailpipe briefly points at the microphone and each firing barks with a fuller body."""
    times, _, crack_db, _ = firings().T
    steps = impulses(times, -amp(crack_db + blast_db))
    return through(steps * swell(2.63, .42, flat=6.6), body(BLAST_SPECTRUM))


def loose_part(pitch_hz=3610, detune=0.0067, t60=.17, swell_s=0.00037, ring_db=2):
    """Shock-excited resonance: a loose metal part tings just after each firing in chosen stretches."""
    track, t, times = np.zeros(N), np.arange(SR // 4) / SR, firings()[:, 0]
    onset = 1 - np.exp(-t / swell_s)
    for start, end, db in LOOSE_RINGS:
        for s in times[(times > start) & (times < end)]:
            hz = pitch_hz * (1 + detune * rng.standard_normal())
            add(track, s, amp(db + ring_db - 60 * t / t60) * onset * np.sin(2 * np.pi * hz * t))
    return track


def knocks(mount_hz=85, t60=0.045, knock_db=2):
    """Damped oscillation: the microphone mount gives dull, short thumps."""
    track, t = np.zeros(N), np.arange(SR // 4) / SR
    onset = 1 - np.exp(-t / 0.00015)
    for s, db in KNOCKS:
        add(track, s, amp(db + knock_db - 60 * t / t60) * onset * np.sin(2 * np.pi * mount_hz * t))
    return track


def scene():
    """Superposition: bike, wind and mount knocks add in one channel."""
    engine = crank() + tinkle() + exhaust() + thuds() + honks() + intake()
    bike = engine + chain() + brake_and_whine() + blasts() + loose_part()
    return (wind() + bike + knocks())[None]


def record(dry):
    """Band limitation: an ideal low-pass passes only frequencies below TOP_HZ."""
    size = next_fast_len(N + SR // 2)
    passband = np.fft.rfftfreq(size, 1 / SR) < TOP_HZ
    return irfft(rfft(dry, size) * passband, size)[:, :N]


dry = scene()
out = record(dry)
file_out(out)
```